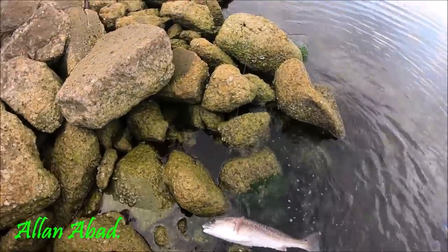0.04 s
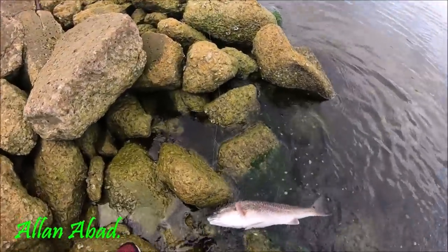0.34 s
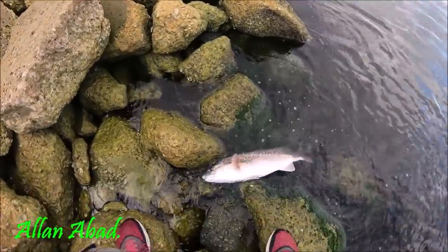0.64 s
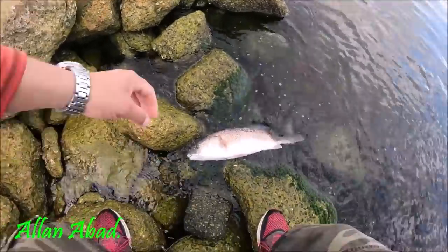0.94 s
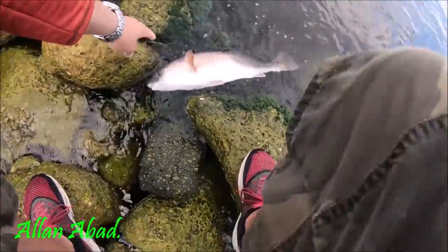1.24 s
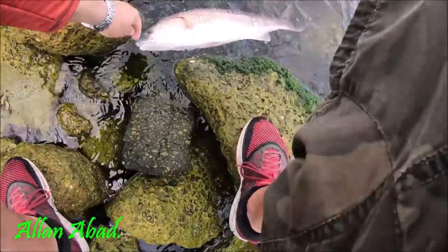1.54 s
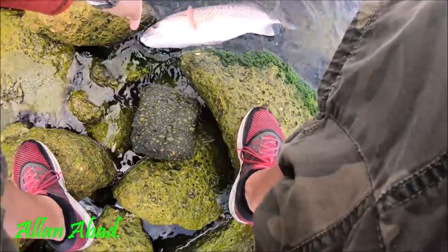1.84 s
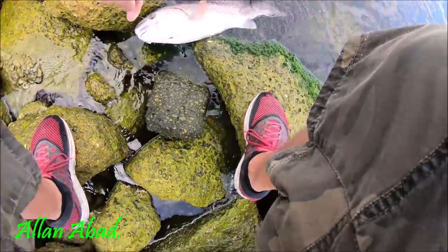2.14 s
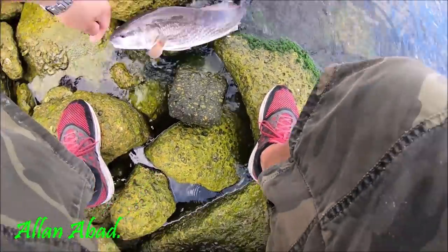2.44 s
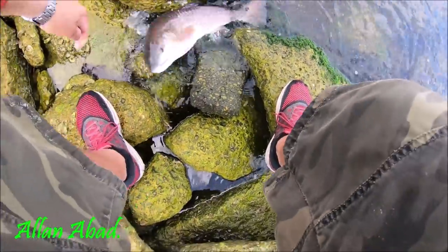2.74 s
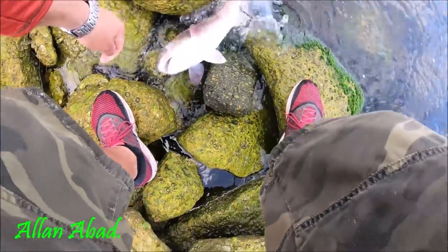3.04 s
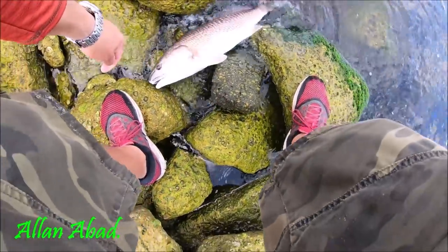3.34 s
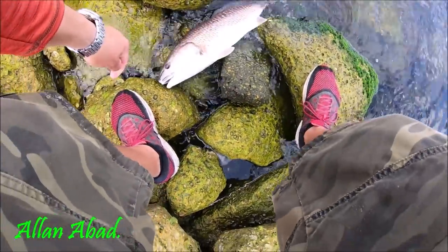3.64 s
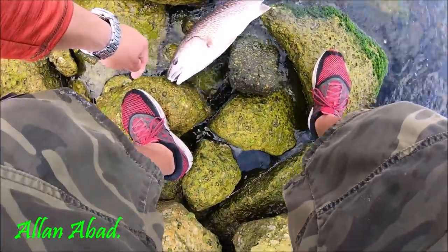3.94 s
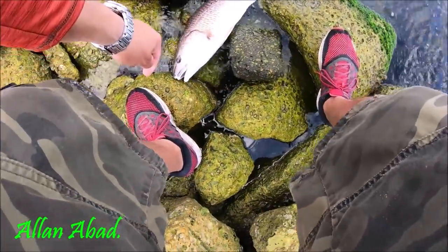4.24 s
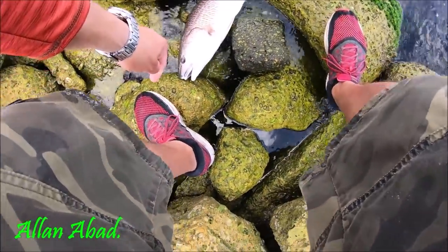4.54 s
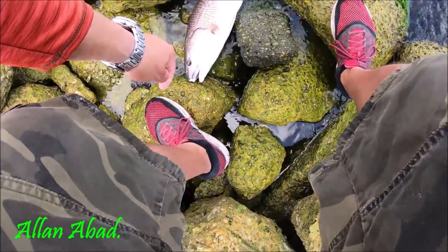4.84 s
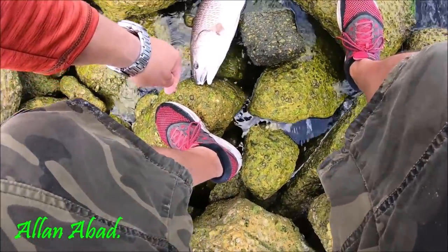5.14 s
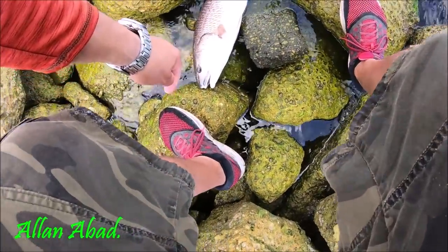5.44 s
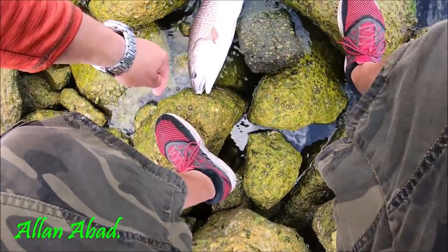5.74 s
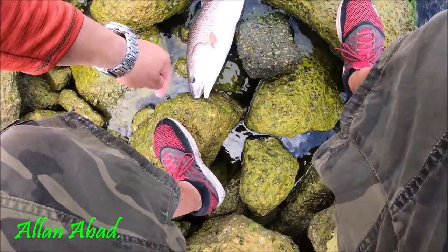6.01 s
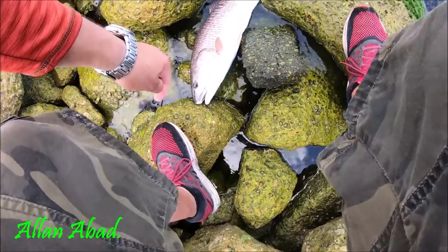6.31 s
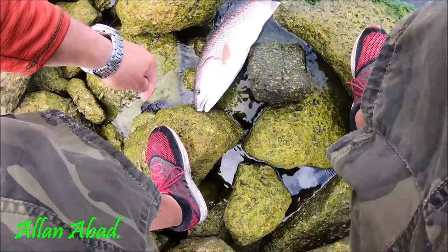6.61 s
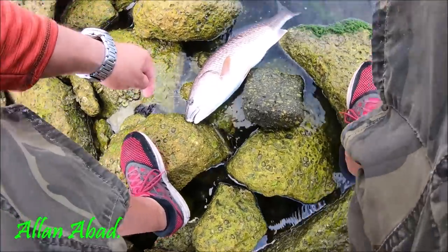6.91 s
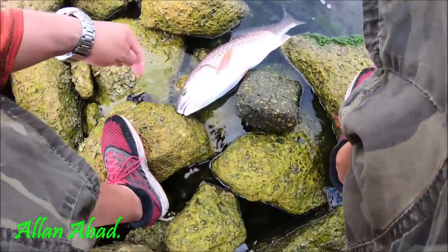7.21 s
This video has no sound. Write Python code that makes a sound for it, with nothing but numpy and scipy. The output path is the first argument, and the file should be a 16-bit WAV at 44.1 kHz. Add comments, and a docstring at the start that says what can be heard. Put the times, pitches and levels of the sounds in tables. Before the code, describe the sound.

Over rumbling road traffic, a fish's tail slaps the shallows for about a second, then water drips as an engine passes.

```python
"""A hooked fish thrashes in the shallows between shore rocks, traffic behind.
From the start vehicles swell and fade, water trickles, the angler's cloth rustles and small taps sound.
At 2.1 s the fish stirs the water; from 2.5 to 3.5 s its tail slaps, throws spray and traps bubbles.
Foam then crackles away among drips and squelches. From 4 s an engine swells, its note falling as it
passes; a sinking gear whine joins near 7 s."""
import sys
import numpy as np
from scipy import signal
from scipy.fft import rfft, irfft
from scipy.io import wavfile
from scipy.ndimage import uniform_filter1d

SR = 44100
rng = np.random.default_rng(int(sys.argv[2]) if len(sys.argv) > 2 else 0)


def transcribe(signal):
    """Save signal, clipped to [-1, 1], as a 16-bit WAV file at the path in sys.argv[1]."""
    frames = np.atleast_2d(signal).T
    limited = np.clip(frames, -1, 1)
    pcm = np.round(limited * 32767).astype(np.int16)
    wavfile.write(sys.argv[1], SR, pcm)


N = 325017
TIME_S = np.arange(N) / SR
BINS_HZ = np.fft.rfftfreq(N, 1 / SR)

# Traffic spectra: freq_hz, density_db
RUMBLE_SPECTRUM = [(12, -28), (25, -8.5), (40, 0), (60, 0.5), (88, 5.5), (104, 4.5), (120, -3.5), (140, -3),
                   (170, -8), (260, -32), (400, -29), (900, -100.5)]
EXHAUST_BOOM_SPECTRUM = [(110, -29.5), (160, -8.5), (195, 0), (230, 0), (270, -13.5), (340, -14.5),
                         (700, -87)]
BODY_ROAR_SPECTRUM = [(170, -36.5), (260, 3.5), (320, 8.5), (400, 2.5), (500, -1), (700, -7.5), (850, -9.5),
                      (1200, -28.5), (2500, -79.5)]
TYRE_SPECTRUM = [(350, -25), (700, -21.5), (880, 8.5), (1020, 9), (1180, 4.5), (1350, -4), (1600, -9.5),
                 (2100, -17.5), (4000, -73.5)]
HISS_SPECTRUM = [(700, -8), (1550, 3.5), (2050, -2), (2900, -5), (3700, -9.5), (4700, -14.5), (5200, -19),
                 (5900, -25), (7500, -25), (9000, -33.5), (11000, -44.5), (13500, -50), (15500, -61.5)]
SCATTER_LOW_SPECTRUM = [(15, -37.5), (40, -23), (80, -5), (130, 7), (215, 1), (320, -5), (450, -8.5),
                        (600, -18.5), (850, -37.5), (1450, -50), (4000, -59.5), (15500, -85)]
SCATTER_AIR_SPECTRUM = [(350, -21), (680, 13), (800, 6), (1050, 2.5), (1500, -7.5), (2500, -14.5),
                        (4000, -24), (6000, -35), (8000, -36), (11000, -45.5), (15500, -59.5)]
# Deep rumble: time_s, level_db
RUMBLE_LEVELS = [(0, -23), (0.5, -21), (0.85, -21), (1.13, -27.5), (1.38, -19), (1.8, -23), (2.35, -27),
                 (2.87, -21.5), (3.55, -20.5), (3.72, -28), (4.1, -25.5), (4.4, -21.5), (4.9, -20),
                 (6.0, -19), (6.7, -19), (7.37, -20.5)]
# Passing vehicles: nearest_s, half_length_s, boom_db, roar_db, tyre_db, hiss_db, scatter_db,
# tilt_db_per_octave, comb_spacing_hz, comb_depth_db
VEHICLES = [(0.167, 0.68, -23, -25.5, -40.5, -53, -41.5, -0.5, 780, 8),
            (1.049, 0.53, -32.5, -29, -47, -53.5, -66, 2, 610, 2),
            (2.311, 0.55, -40, -38, -47, -56, -50.5, -4, 674, 8),
            (4.146, 0.93, -44.5, -41.5, -48, -58, -48.5, 11.5, 520, 2.5),
            (5.013, 1, -30.5, -39, -48, -67.5, -46, 3, 489, 3),
            (6.036, 0.92, -29.5, -30.5, -40, -66.5, -43, -2.5, 471, 0),
            (6.992, 1, -32, -28.5, -60, -53.5, -41, 0, 528, 2.5)]
# Steady far road: as VEHICLES, from boom_db on
FAR_ROAD = (-35, -40.5, -53.5, -53.5, -50, 3.5, 602, 0.5)
# Passing engine: time_s, firing_hz, level_db
ENGINE_TRACK = [(4.0, 95.94, -37), (5.0, 95.08, -26), (5.4, 94.1, -27), (5.8, 94.6, -27.5),
                (6.2, 92.06, -26), (6.6, 89.7, -25), (7.37, 84.2, -25.5)]
# Exhaust partials: firing_multiple, gain_db
ENGINE_ORDERS = [(1, 4), (1.5, -1.5), (2, -10), (2.5, -22.5)]
# Gear whine: time_s, pitch_hz, level_db
WHINE_TRACK = [(6.3, 517.3, -70), (6.86, 500.1, -46), (6.95, 493.5, -28), (7.15, 489, -35.5),
               (7.37, 481, -37.5)]

# Friction spectra: freq_hz, density_db
CLOTH_SPECTRUM = [(1500, -10.5), (3000, -0.5), (4700, -4.5), (5500, -1.5), (6300, -1), (7600, -3),
                  (9000, -8), (11000, -19), (15500, -39)]
SAND_SPECTRUM = [(5000, -27), (8000, 0), (10500, -1), (12500, 0), (14000, -5), (15500, -9)]
# Cloth rubbing as the angler shifts: middle_s, length_s, level_db
CLOTH_SHIFTS = [(0.3, 2.3, -64.5), (1.48, 0.38, -65), (3.994, 0.81, -72), (7.05, 0.42, -66)]
# Swishes and scrapes of cloth and soles, quick fin flicks just before the splash:
# middle_s, length_s, centre_hz, level_db, half_width_ratio
SWISHES = [(0.12, 0.3, 4780, -67.5, 0.044), (0.29, 0.64, 2530, -51, 0.32), (0.257, 0.68, 3580, -64, 0.16),
           (0.575, 0.089, 5570, -59, 0.16), (0.61, 0.14, 8240, -63, 0.34), (0.63, 0.13, 6300, -74, 0.044),
           (0.66, 0.053, 3300, -62, .15), (0.986, 0.25, 4650, -64, .08), (1.162, 0.15, 4330, -64, .08),
           (1.572, 0.45, 6140, -76, 0.039), (1.454, 0.14, 7500, -66, 0.12), (1.7, 0.23, 7400, -65.5, 0.083),
           (2.18, 0.031, 3100, -36.5, 0.12), (2.183, 0.057, 7000, -57, 0.55),
           (2.245, 0.11, 3160, -48, 0.34), (2.268, 0.0074, 4170, -41, 0.19), (2.269, 0.05, 8000, -63, .4),
           (2.31, 0.012, 3850, -37, 0.35), (2.311, 0.029, 8000, -60, .45), (2.393, 0.088, 7540, -65, 0.55),
           (5.266, 0.035, 4180, -55, .09), (5.455, 0.029, 7600, -58, .19), (6.95, 0.055, 7800, -64.5, 0.18),
           (7.017, 0.4, 4587, -62.5, 0.12), (7.053, 0.28, 2770, -48.5, 0.14), (7.2, 0.11, 5600, -66, 0.3)]
# Sand under soles and tackle: middle_s, length_s, level_db
SAND_CRUNCHES = [(0.58, 0.07, -75), (1.021, 0.004, -65), (1.666, 0.005, -73), (2.178, 0.018, -75),
                 (2.268, 0.012, -74), (2.311, 0.013, -63), (4.106, 0.006, -71), (5.18, 0.02, -77),
                 (5.33, 0.03, -71), (5.456, 0.014, -69)]
# Sharp taps on wet rock, drips and squelches after the splash:
# start_s, centre_hz, level_db, width_octaves, decay_s
TAPS_AND_DRIPS = [(0.6083, 2050, -18, 0.55, 0.00084), (0.608, 3400, -26, 0.29, 0.004),
                  (0.6178, 2060, -22, 0.58, 0.0023), (0.622, 3300, -39, 0.72, 0.0036),
                  (0.677, 4000, -36.5, 1, 0.0022), (0.6867, 3270, -29, 0.65, 0.0015),
                  (0.81, 7000, -47, 0.5, 0.002), (0.967, 2240, -36, 1, 0.0031),
                  (1.0195, 6300, -39, 0.65, 0.0015), (1.059, 7540, -53, 0.36, 0.0015),
                  (1.208, 7000, -46, 0.3, 0.0022), (1.235, 4420, -38, 0.56, 0.0019),
                  (1.315, 4660, -42, 0.15, 0.0023), (1.6647, 4930, -32, 0.86, 0.0017),
                  (2.025, 4600, -44, 0.15, 0.002), (2.076, 5600, -47, 0.39, 0.0024),
                  (2.094, 3900, -38, 0.33, 0.002), (2.465, 5200, -41, 0.18, 0.0029),
                  (2.476, 6500, -49, 0.54, 0.0027), (3.5263, 3040, -27, 0.24, 0.0023),
                  (3.527, 5500, -43, 0.4, 0.001), (3.5356, 6300, -38, 0.23, 0.0022),
                  (3.574, 3660, -44, 0.9, 0.0016), (3.764, 7500, -49, 0.53, 0.002),
                  (3.891, 7460, -46, 0.35, 0.0015), (3.98, 3900, -37, 0.28, 0.0015),
                  (4.104, 4240, -27.5, 0.77, 0.0027), (4.2922, 2840, -31, 0.48, 0.0024),
                  (4.343, 2980, -27, 0.42, 0.0018), (4.475, 4570, -38, 0.21, 0.0017),
                  (4.5436, 2730, -24.5, 0.39, 0.002), (4.5636, 3280, -28.5, 0.31, 0.0018),
                  (4.59, 3040, -33.5, 0.41, 0.0023), (4.697, 2930, -32, 0.3, 0.002),
                  (4.892, 3000, -35, 0.35, 0.0015), (5.0741, 2600, -34, 0.61, 0.0019),
                  (5.215, 3060, -30, 0.44, 0.0024), (5.262, 3420, -28, 0.39, 0.0071),
                  (5.328, 2700, -29.5, 0.57, 0.0062), (5.41, 2620, -26, 0.42, 0.0031),
                  (5.455, 6500, -36.5, 0.68, 0.0022), (5.5476, 2800, -30, 0.36, 0.0019),
                  (5.575, 2190, -26.5, 0.5, 0.002), (5.6897, 2680, -34, 0.33, 0.0087),
                  (5.713, 2993, -30.5, 0.48, 0.0012), (5.7473, 3000, -39, 1, 0.0017),
                  (6.015, 2520, -38, 0.73, 0.0036), (6.9354, 2500, -24, 0.8, 0.0041),
                  (6.937, 5000, -49, 0.55, 0.005)]

# Water spectra: freq_hz, density_db
FOAM_FIZZ_SPECTRUM = [(4000, -26), (7000, -5), (8800, 2.5), (10500, -7.5), (13000, -12.5), (15500, -18.5)]
SPRAY_SPECTRUM = [(650, -30), (1100, 2.5), (1550, 4), (2100, -3.5), (2600, 6), (3050, 8), (3600, 3),
                  (4300, 2), (5150, -5.5), (6000, -13.5), (7300, -11.5), (8400, -16.5), (9600, -25),
                  (13000, -32), (15500, -34)]
GURGLE_SPECTRUM = [(150, -18.5), (260, 0), (350, 5), (520, 1), (740, 1), (950, -5.5), (1200, -10.5),
                   (1600, -6), (2100, -15), (3500, -34)]
CLAP_SPECTRUM = [(700, -38.5), (1100, -19), (1350, 0), (1550, 3), (1800, -6), (2200, -8), (3000, -53)]
MIST_SPECTRUM = [(3000, -22), (6000, 2), (7600, 7), (9500, -5), (13000, -16), (15500, -23)]
# Largest air pockets and drops: start_s, pitch_hz, level_db, pitch_rise_per_decay
BIG_BUBBLES = [(2.524, 477, -21.5, .03), (2.541, 624, -25, 0.043), (2.5512, 724, -18, 0.04),
               (2.561, 650, -17, .04), (2.567, 3490, -17, 0.045), (2.5695, 4150, -27, .03),
               (2.573, 2870, -22, .03), (2.574, 835, -23, 0.034), (2.583, 6300, -35, .02),
               (2.626, 2920, -27, .02), (2.717, 4400, -29, .02), (2.7292, 5000, -25, .02),
               (2.7372, 3000, -15.5, 0.018), (2.7615, 1470, -24, 0.018), (2.764, 2950, -23, .02),
               (2.8127, 1580, -15, .02), (2.8184, 704, -14.5, .015), (2.829, 700, -20, .02),
               (2.8397, 422, -14.5, .04), (2.857, 2500, -20, .02), (2.863, 1780, -20, .02),
               (2.88, 290, -32, .03), (2.897, 404, -16, .04), (2.909, 1405, -22, .02),
               (2.91, 2230, -25, .02), (2.912, 310, -11, .03), (2.926, 4000, -17.5, .02),
               (2.927, 6700, -29, .02), (2.928, 615, -18, .04), (2.932, 1300, -21, .02),
               (2.935, 355, -13, 0.043), (2.9465, 576, -14, 0.047), (2.95, 1470, -22, .02),
               (2.953, 776, -16, 0.029), (2.962, 553, -14, 0.059), (2.969, 2010, -21, 0.022),
               (2.972, 760, -26, .04), (2.983, 1360, -26, .02), (2.981, 4730, -24, 0.027),
               (2.9829, 673, -11.5, .03), (3.0036, 5050, -29, 0.027), (3.006, 480, -11, 0.11),
               (3.02, 8050, -29, 0.02), (3.025, 410, -23, .04), (3.031, 560, -20, .04),
               (3.032, 1700, -23, .02), (3.04, 3110, -23, .02), (3.042, 1720, -20, .03),
               (3.052, 1440, -17, .02), (3.043, 150, -10, 0.02), (3.045, 336, -17, 0.078),
               (3.098, 550, -24, 0.027), (3.1307, 724, -21, 0.022), (3.136, 303, -19, 0.033),
               (3.1991, 410, -9.5, .015), (3.2634, 710, -16.5, 0.029), (3.3181, 3020, -14.5, 0.026),
               (3.32, 6800, -21.5, .03), (3.3637, 375, -22, 0.018), (3.367, 3000, -20, .02),
               (3.434, 318, -16, 0.042), (3.4997, 4770, -33, .02), (3.6239, 2770, -36, .02),
               (5.262, 4270, -34, .02), (5.412, 1530, -24, 0.022)]
# Churned water: start_s, hold_s, spray_db, gurgle_db
SURGES = [(2.474, 0.057, -45, -36), (2.534, 0.026, -38, -30), (2.604, 0.1, -57, -40.5),
          (2.693, 0.032, -46, -44), (2.736, 0.11, -40, -40), (2.8, 0.11, -35.5, -31.5),
          (2.921, 0.14, -35, -34.5), (3.068, 0.13, -38, -36), (3.185, 0.2, -40.5, -40),
          (3.367, 0.23, -54, -39.5)]
# Tail slaps and falling water: start_s, spray_db, gurgle_rel_db, clap_rel_db, mist_rel_db (re spray)
TAIL_SLAPS = [(2.498, -41, -6, 11.5, -25), (2.505, -35.5, -12, -15, -29), (2.523, -41, 2, -12, -12),
              (2.5393, -29.5, -5, -18, -22), (2.55, -36, 15, 3, -20), (2.568, -28, -2, -20, -26),
              (2.596, -38, -6, 5, -16), (2.622, -41, -4, 8, -9), (2.716, -38, -15, -14, -14),
              (2.736, -28, -6, -4.5, -25), (2.762, -27, -8, -8, -11), (2.775, -24, -18, -15, -14),
              (2.807, -30, -6, -4, -10), (2.8112, -19.5, -4, -6, -18), (2.8205, -27.5, 0, 2, -23),
              (2.833, -32, -3, -1, -20), (2.8494, -36, -2, -12, -20), (2.861, -33, -8, 3, -27),
              (2.903, -27, -6, 3, -16), (2.91, -38, 8, 12, -20), (2.9444, -34, 12, -4, -20),
              (2.962, -30, 7, 1, -22), (2.9795, -28, -2, -3, -25), (3.004, -25, -10, -17, -16),
              (3.04, -23, 2, -5, -22), (3.053, -29, 1, -5, -17), (3.0966, -26, -13, -4, -25),
              (3.1068, -32, -10, 2, -20), (3.12, -27, -13, -10, -25), (3.1507, -39.5, -10, 13, -20),
              (3.2025, -29.5, -4, -3.5, -16), (3.222, -31, -12, -3, -18), (3.248, -24.5, -15, -13, -28),
              (3.284, -36, -13, -10, -17), (3.3009, -30, -14, -12, -16), (3.3175, -26.5, -22, -16, -15),
              (3.357, -26, -12, -13, -24), (3.367, -32, -6, -10, -20), (3.3844, -43, -12, -10, -13),
              (3.433, -34, 6, -19, -28)]
# Stereo width of near sounds: freq_hz, side_to_mid_db
NEAR_WIDTH = [(100, -30), (400, -39), (1200, -54), (2800, -57.5), (5000, -26.5), (8000, -23), (11000, -15),
              (14000, 9.5)]


def amp(db):
    """Decibels to gain."""
    return 10 ** (np.asarray(db) / 20)


def unit(x):
    """Scale to rms 1."""
    return x / np.sqrt(np.mean(x ** 2) + 1e-20)


def db_at(spectrum, hz):
    """Spectrum level, interpolated over log frequency."""
    freq_hz, db = np.transpose(spectrum)
    return np.interp(np.log(hz + 1), np.log(freq_hz + 1), db)


def curve(rows, column=1):
    """Table column, interpolated over time."""
    rows = np.asarray(rows)
    return np.interp(TIME_S, rows[:, 0], rows[:, column])


def colour(x, spectrum):
    """Minimum-phase filter; attacks stay sharp."""
    gain_db = np.maximum(db_at(spectrum, abs(np.fft.fftfreq(8192, 1 / SR))), -100)
    response = np.exp(np.conj(signal.hilbert(np.log(amp(gain_db)))))
    impulse = np.fft.ifft(response).real
    return signal.oaconvolve(x, impulse[:len(impulse) // 2])[:len(x)]


def noise(spectrum):
    """Shaped noise, slow swells levelled."""
    x = irfft(rfft(rng.standard_normal(N)) * amp(db_at(spectrum, BINS_HZ)), N)
    return x / np.sqrt(uniform_filter1d(uniform_filter1d(x ** 2, size=5000), size=5000))


def drift(rate_hz):
    """Slow random wander, rms 1."""
    return unit(irfft(rfft(rng.standard_normal(N)) / (1 + (BINS_HZ / rate_hz) ** 4), N))


def sizes(spread_db, cap=4):
    """Random gains, a few far above the rest."""
    return amp(spread_db * np.minimum(rng.exponential(1, N), cap))


def add(mix, start_s, sound):
    """Mix in place."""
    part = mix[max(round(start_s * SR), 0):][:len(sound)]
    part += sound[:len(part)]


def stroke(middle_s, length_s):
    """Bell envelope of one movement."""
    return np.exp(-(2 * (TIME_S - middle_s) / length_s) ** 2)


def bubble(hz, decay_s, rise):
    """An air pocket rings, rising in pitch as it nears the surface."""
    age = np.arange(int(7 * decay_s * SR) + 2) / (decay_s * SR)
    envelope = np.exp(-age) * (1 - np.exp(-4 * age))
    return envelope * np.sin(2 * np.pi * hz * decay_s * (age + rise * age ** 2 / 2))


def cloud(low_hz, high_hz, per_s, cycles, spread_db, pitches):
    """Random bubbles, rms 1; decays scatter around `cycles` periods."""
    out = np.zeros(N)
    for hz in np.geomspace(low_hz, high_hz, pitches):
        births = sizes(spread_db) * (rng.random(N) < per_s / pitches / SR)
        ring = bubble(hz, decay_s=cycles * rng.uniform(0.14, 3.4) / hz, rise=rng.uniform(0, 0.052))
        out += signal.oaconvolve(births, ring)[:N] * hz / high_hz
    return unit(out)


def pass_bys(steepness=3.34):
    """Vehicles swell and fade over the far road: five gains, then power-weighted tilt and comb."""
    t = np.linspace(0, N / SR, num=400)
    rows = np.array(VEHICLES)
    nearness = (1 + ((t - rows[:, :1]) / rows[:, 1:2]) ** 2) ** -steepness
    nearness = np.vstack([nearness, np.ones(len(t))])
    levels_db, tone = np.split(np.vstack([rows[:, 2:], FAR_ROAD]), [5], axis=1)
    gains = np.sqrt(amp(levels_db.T) ** 2 @ nearness)
    weight = (amp(levels_db[:, 1:3]) ** 2).sum(axis=1)[:, None] * nearness  # roar + tyre power
    mean_tone = tone.T @ weight / weight.sum(axis=0)
    return [np.interp(TIME_S, t, track) for track in [*gains, *mean_tone]]


def traffic():
    """Rumble, boom, hiss, and roar and tyres combed by the road echo. Returns direct, shore-scattered."""
    boom, roar, tyres, hiss, scatter, tilt_db_per_octave, spacing_hz, depth_db = pass_bys()
    low = noise(RUMBLE_SPECTRUM) * amp(curve(RUMBLE_LEVELS)) + noise(EXHAUST_BOOM_SPECTRUM) * boom
    rolling = noise(BODY_ROAR_SPECTRUM) * roar + noise(TYRE_SPECTRUM) * tyres
    hz, t, frames = signal.stft(rolling, SR, nperseg=1024)
    hz = hz[:, None]
    ripple = np.cos(2 * np.pi * hz / np.interp(t, TIME_S, spacing_hz))
    comb_db = np.interp(t, TIME_S, depth_db) * ripple * np.exp(-(hz / 1500) ** 2)
    tilt_db = np.interp(t, TIME_S, tilt_db_per_octave) * np.log2(np.clip(hz, 250, 800) / 500)
    swept = signal.istft(frames * amp(comb_db + tilt_db), SR)[1][:N]
    direct = low + swept + noise(HISS_SPECTRUM) * hiss * amp(1.5 * drift(24))
    air = amp(-10) * (scatter / scatter.max()) ** 2  # only near vehicles scatter treble
    return direct, scatter * (noise(SCATTER_LOW_SPECTRUM) + air * noise(SCATTER_AIR_SPECTRUM))


def engine():
    """Wavering exhaust note and gear whine sink as the vehicle passes."""
    firings = np.cumsum(curve(ENGINE_TRACK) * (1 + 0.004 * drift(5))) / SR
    exhaust = sum(amp(db + 2.2 * drift(5)) * np.sin(2 * np.pi * (order * firings + rng.random()))
                  for order, db in ENGINE_ORDERS)
    whine_hz = curve(WHINE_TRACK) * (1 + 0.01183 * drift(25))
    whine = np.sin(2 * np.pi * np.cumsum(whine_hz) / SR) * amp(2 * drift(23))
    return exhaust * amp(curve(ENGINE_TRACK, column=2)) + whine * amp(curve(WHINE_TRACK, column=2))


def lapping(calm_db=-66, stirred_db=-59, stir_s=2.14, settle_db_per_s=9.5):
    """Water trickles and drips between stones, louder once the fish stirs it."""
    trickle = cloud(1400, 3600, per_s=400, cycles=2, spread_db=2.2, pitches=16) * amp(2.5 * drift(6))
    drips = cloud(2200, 3800, per_s=30, cycles=1.5, spread_db=2, pitches=6)
    since_s = TIME_S - stir_s
    onset = np.clip(since_s / 0.06 + 1, 0, 1)
    stirred = onset * amp(stirred_db - settle_db_per_s * np.maximum(since_s, 0))
    return (trickle + amp(-15.5) * drips) * (amp(calm_db) + stirred)


def rustle(grains_per_s=2500, rest_db=-79, uneven_db=2, top_hz=9500):
    """Fibres and grit catch and slip; each swish, scrape or fin flick has its own band."""
    grains = rng.standard_normal(N) * sizes(spread_db=4) * (rng.random(N) < grains_per_s / SR)
    friction = unit((unit(grains) + 3 * rng.standard_normal(N)) * amp(uneven_db * drift(22)))
    shifts = sum(amp(db) * stroke(middle_s, length_s) for middle_s, length_s, db in CLOTH_SHIFTS)
    out = unit(colour(friction, CLOTH_SPECTRUM)) * (amp(rest_db) + shifts)
    soft_spectrum = rfft(friction) / np.sqrt(1 + (BINS_HZ / top_hz) ** 10)
    for middle_s, length_s, hz, db, width in SWISHES:
        band = (1 + ((BINS_HZ - hz) / (width * hz)) ** 2) ** -1.3
        out += unit(irfft(soft_spectrum * band, N)) * amp(db) * stroke(middle_s, length_s)
    return out


def sand(grains_per_s=4000):
    """Grains crack in short, bright clusters."""
    cracks = rng.standard_normal(N) * sizes(spread_db=1, cap=3) * (rng.random(N) < grains_per_s / SR)
    clusters = sum(amp(db) * stroke(middle_s, length_s) for middle_s, length_s, db in SAND_CRUNCHES)
    return unit(colour(cracks, SAND_SPECTRUM)) * clusters


def taps_and_drips(gain_db=-2, top_hz=9000, rise_ratio=0.57, scuff_db=-20.5, scuff_s=0.013):
    """Taps on wet rock, drips and squelches: a crack around one pitch, then a faint scuff."""
    out, t = np.zeros(N), np.arange(4096) / SR
    bins_hz = np.fft.rfftfreq(len(t), 1 / SR) + 1
    for start_s, hz, db, width_octaves, decay_s in TAPS_AND_DRIPS:
        octaves = np.log2(bins_hz / hz)
        rolloff = (1 + (octaves / width_octaves) ** 6) * (1 + (bins_hz / top_hz) ** 10)
        band = amp(-3 * octaves) / np.sqrt(rolloff)
        crack, scuff = (unit(irfft(rfft(rng.standard_normal(len(t))) * band)) for _ in range(2))
        tap = crack * np.exp(-t / decay_s) + amp(scuff_db) * scuff * np.exp(-t / scuff_s)
        attack = 1 - np.exp(-t / (rise_ratio * decay_s))  # cushioned by weed and water
        add(out, start_s, amp(db + gain_db) * attack * tap)
    return out


def foam(pop_db=-61, pop_fade_db_per_s=7, fizz_db=-76.5, fizz_fade_db_per_s=6):
    """From the last surge on, tiny bubbles burst over a fine fizz, fading."""
    since_s = TIME_S - SURGES[-1][0]
    age_s = np.maximum(since_s, 0)
    pops = cloud(2400, 9000, per_s=51, cycles=1.5, spread_db=2.5, pitches=14)
    fizz = cloud(6000, 15000, per_s=1500, cycles=1.5, spread_db=2.5, pitches=10)
    pops = unit(colour(pops, SPRAY_SPECTRUM)) * amp(pop_db - pop_fade_db_per_s * age_s)
    fizz = unit(colour(fizz, FOAM_FIZZ_SPECTRUM)) * amp(fizz_db - fizz_fade_db_per_s * age_s)
    return (since_s > 0) * (pops + fizz)


def plops(decay_at_1khz_s=0.0047):
    """The largest bubbles ring singly, deep ones longest."""
    out = np.zeros(N)
    for start_s, hz, db, rise in BIG_BUBBLES:
        decay_s = decay_at_1khz_s * np.sqrt(1000 / hz)
        add(out, start_s, amp(db) * bubble(hz, decay_s, rise))
    return out


def spray(plink_db=-9.5, hiss_db=-1, clump_db=2, clump_hz=130):
    """Droplets and longer-ringing drops land in clumps over a hiss."""
    droplets = cloud(1200, 14000, per_s=9000, cycles=4.8, spread_db=4.5, pitches=64)
    plinks = cloud(1300, 7500, per_s=360, cycles=11, spread_db=1.5, pitches=20)
    shower = droplets + amp(plink_db) * plinks + amp(hiss_db) * rng.standard_normal(N)
    return unit(colour(shower, SPRAY_SPECTRUM) * amp(clump_db * drift(clump_hz)))


def gurgle(noise_db=-24):
    """Trapped air pockets ring in a low cloud."""
    pockets = cloud(220, 2400, per_s=1100, cycles=6, spread_db=2.2, pitches=36)
    return unit(colour(pockets + amp(noise_db) * rng.standard_normal(N), GURGLE_SPECTRUM))


def thrashing(surge_rise_s=0.016, surge_fall_s=0.042, slap_rise_s=0.0015, slap_fall_s=0.008):
    """Surges and tail slaps drive spray and gurgle; slaps also clap on trapped air and throw mist."""
    spray_power, gurgle_power, clap_power, mist_power = np.zeros((4, N))
    t = np.arange(SR // 2) / SR
    for start_s, hold_s, spray_db, gurgle_db in SURGES:
        surge = (1 - np.exp(-t / surge_rise_s)) * np.exp(-np.maximum(t - hold_s, 0) / surge_fall_s)
        add(spray_power, start_s, (surge * amp(spray_db)) ** 2)
        add(gurgle_power, start_s, (surge * amp(gurgle_db)) ** 2)
    for start_s, spray_db, gurgle_rel_db, clap_rel_db, mist_rel_db in TAIL_SLAPS:
        burst = amp(spray_db) * (1 - np.exp(-t / slap_rise_s)) * np.exp(-t / slap_fall_s)
        add(spray_power, start_s, burst ** 2)
        add(gurgle_power, start_s, (burst * amp(gurgle_rel_db)) ** 2)
        add(clap_power, start_s, (burst * amp(clap_rel_db)) ** 2)
        add(mist_power, start_s, (burst * amp(mist_rel_db)) ** 2)
    return (spray() * np.sqrt(spray_power) + gurgle() * np.sqrt(gurgle_power)
            + noise(CLAP_SPECTRUM) * np.sqrt(clap_power) + noise(MIST_SPECTRUM) * np.sqrt(mist_power))


def rock_echoes(x, echoes_per_s=2500, rt60_s=0.091):
    """Near boulders add two single echoes; the rest scatter a short tail."""
    t = np.arange(SR // 4) / SR
    scatter = rng.standard_normal(len(t)) * (rng.random(len(t)) < echoes_per_s / SR)
    scatter *= (t > 0.003) * amp(-60 * t / rt60_s)
    tail = signal.oaconvolve(x, scatter / np.linalg.norm(scatter))[:N]
    out = x + colour(tail, [(300, -20), (4000, -13.5), (12000, -1)])
    for delay_s, db in [(0.0019, -34), (0.0031, -29.5)]:
        add(out, delay_s, amp(db) * x)
    return out


def scene():
    """Mid/side mix: near sounds almost centred, scattered traffic wide."""
    near = rustle() + sand() + rock_echoes(thrashing() + plops() + taps_and_drips() + lapping() + foam())
    road, scattered = traffic()
    mid = road + engine() + near
    hz, _, frames = signal.stft(near, SR, nperseg=512)
    random_phase = np.exp(2j * np.pi * rng.random(frames.shape))  # drops land all around
    side_frames = frames * amp(db_at(NEAR_WIDTH, hz))[:, None] * random_phase
    side = signal.istft(side_frames, SR)[1][:N] + scattered
    return np.array([mid + side, mid - side])


def record(dry, cutoff_hz=15700):
    """Band limit."""
    lowpass = signal.firwin(511, cutoff_hz, window=("kaiser", 9), fs=SR)
    return signal.oaconvolve(dry, lowpass[None], "same")


dry = scene()
out = record(dry)
transcribe(out)
```